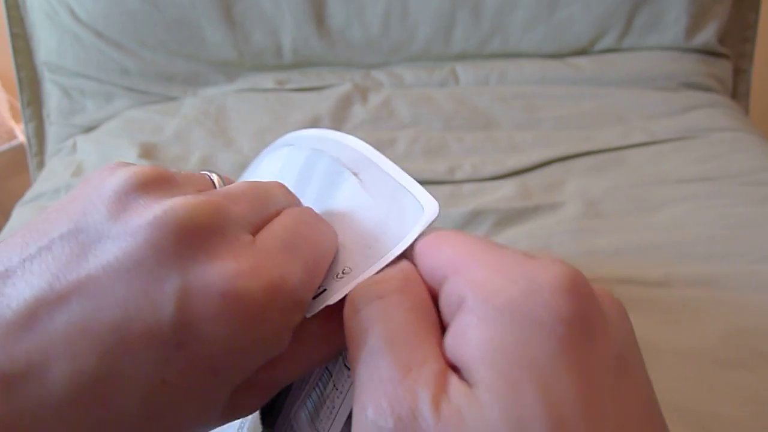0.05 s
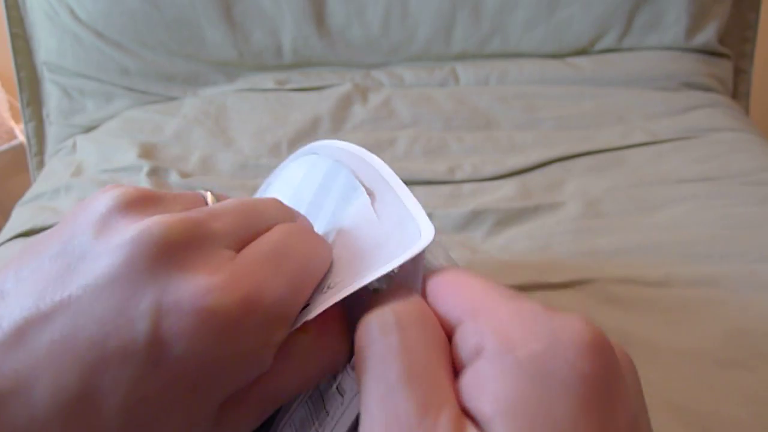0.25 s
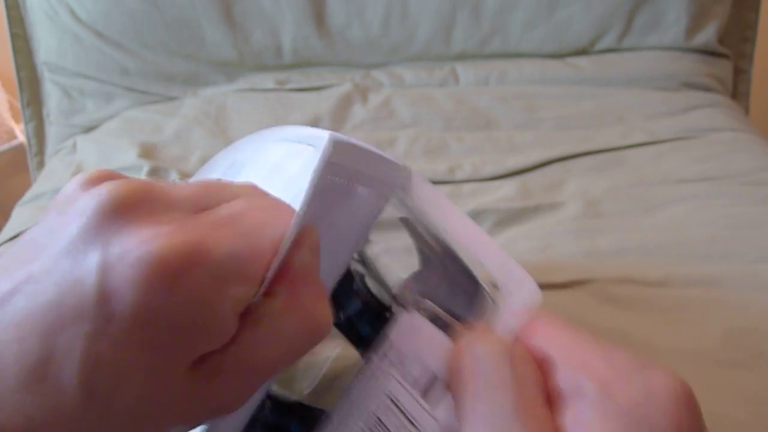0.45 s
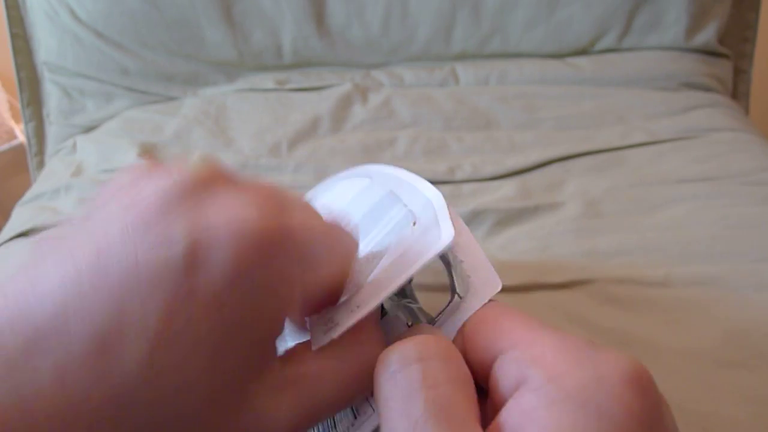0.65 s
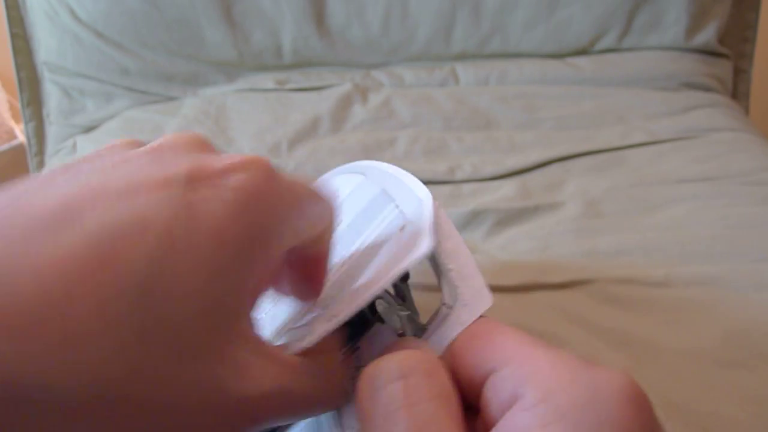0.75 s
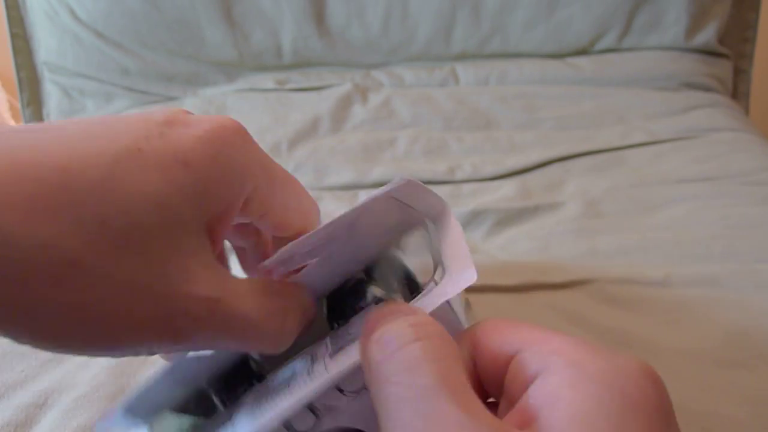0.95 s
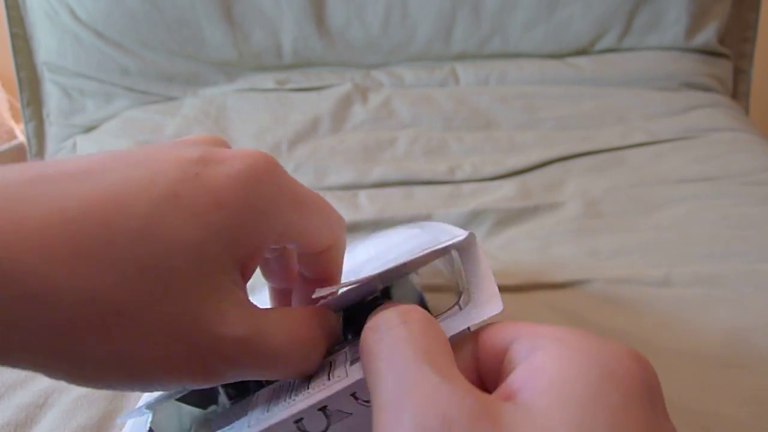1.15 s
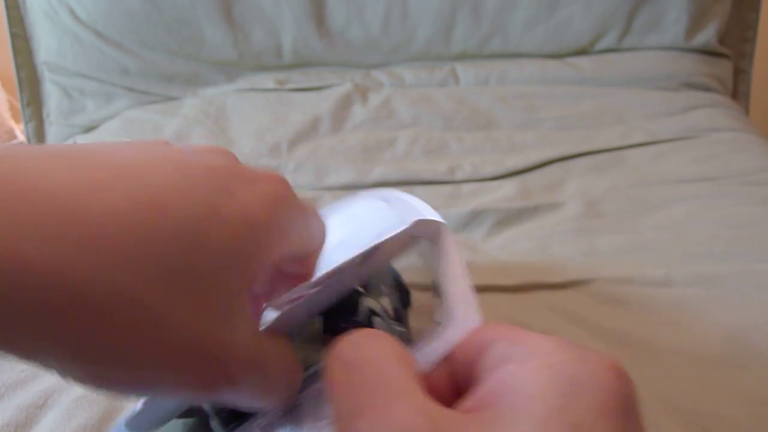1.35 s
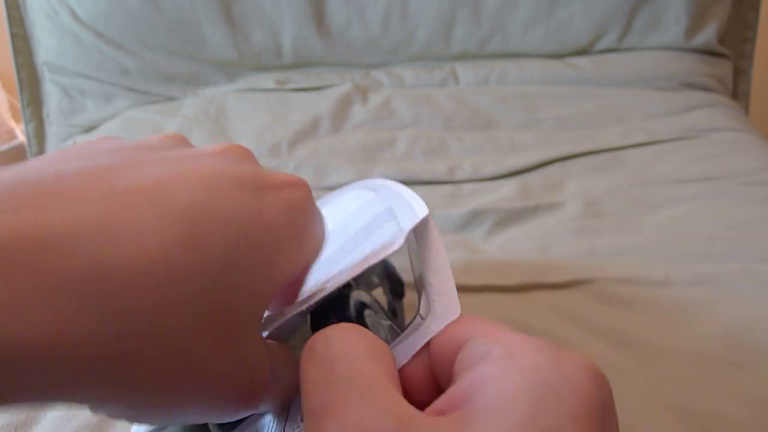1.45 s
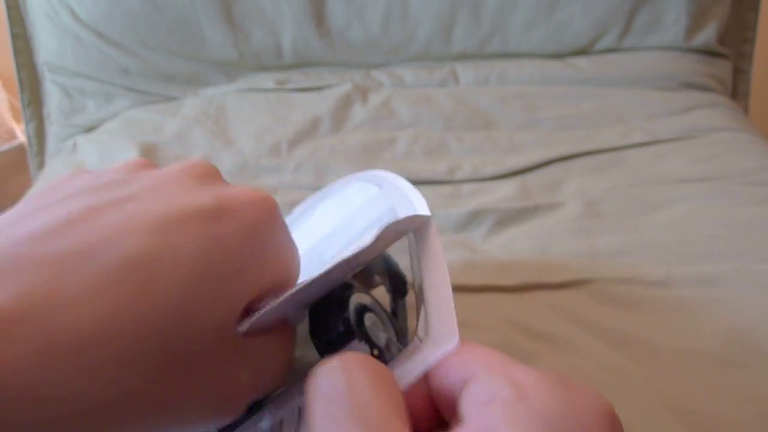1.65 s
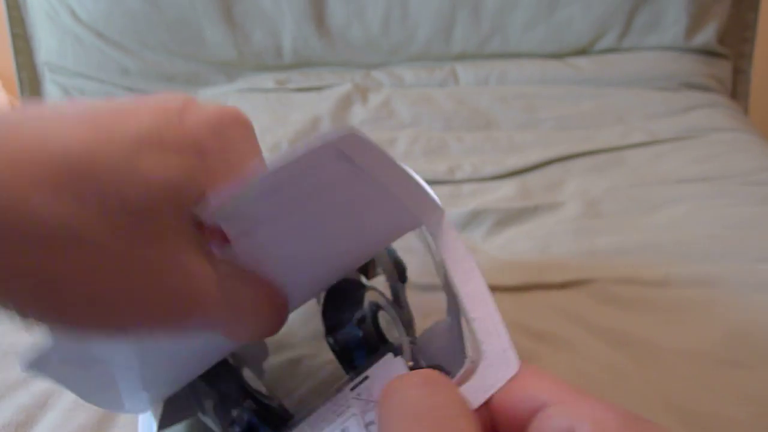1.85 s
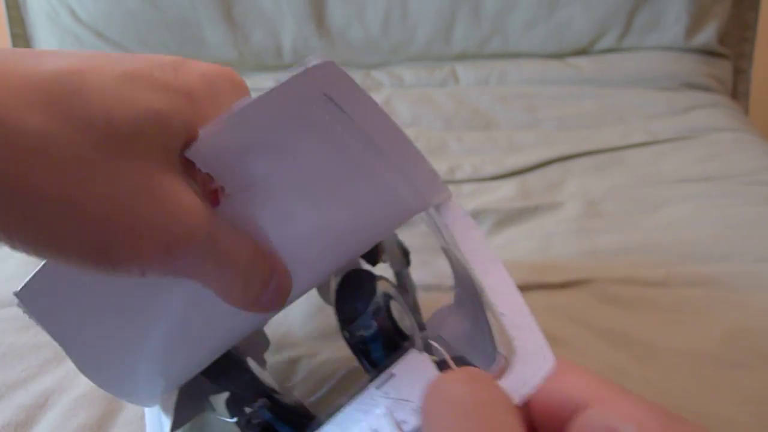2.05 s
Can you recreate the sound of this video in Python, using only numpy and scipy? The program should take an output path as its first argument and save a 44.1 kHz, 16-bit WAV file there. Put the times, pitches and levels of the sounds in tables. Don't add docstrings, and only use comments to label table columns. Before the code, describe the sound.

Close and dry in a furnished room, hands pull paper card off a plastic pack with crackling and popping, pause with faint ticks and soft knocks, then tear again in sharp, bright cracks over faint hiss.

```python
import sys
import numpy as np
from scipy import signal
from scipy.fft import rfft, irfft
from scipy.io import wavfile
from scipy.ndimage import uniform_filter1d

SR = 44100
rng = np.random.default_rng(int(sys.argv[2]) if len(sys.argv) > 2 else 0)


def rack_gain(trim_db):
    fader = np.asarray(trim_db, float)
    return 10 ** (fader / 20)


def generate_wav(signal):
    frames = np.transpose(np.atleast_2d(signal))
    scaled = np.clip(frames, -1, 1) * 32767
    pcm = np.round(scaled).astype(np.int16)
    wavfile.write(sys.argv[1], SR, pcm)


N = 92610
REGRIP_S = 1.3

# pitch_hz, width_hz, level_db
CARD_MODES = [(430, 32, -3.5), (507, 19.6, 1.5), (750, 34.6, 5), (959, 22, 4), (1215, 39, -1.5),
              (1346, 32, 3.5), (1601, 49, -2), (1818, 40, 0)]
# pitch_hz, width_hz, level_db
EARLY_BLISTER_MODES = [(2500, 510, -6), (3170, 94, 1), (4000, 620, -13), (4800, 143, -0.5),
                       (5590, 1100, -11), (6750, 130, -13)]
# pitch_hz, width_hz, level_db
LATE_BLISTER_MODES = [(2440, 300, 4.5), (2977, 130, 12.5), (3518, 135, 9.5), (4540, 130, -1),
                      (4833, 640, 2), (6300, 230, 8.5)]


def evened(x):
    return x / np.sqrt(np.mean(x ** 2) + 1e-20)


def peaked(x):
    return x / abs(x).max()


def add(mix, start_s, sound):
    part = mix[round(start_s * SR):][:len(sound)]
    part += sound[:len(part)]


def slow(seconds):
    width = int(seconds * SR)
    once = uniform_filter1d(rng.standard_normal(N), width)
    return evened(uniform_filter1d(once, width))


def ring(x, hz, width_hz):
    return signal.lfilter(*signal.iirpeak(hz, hz / width_hz, SR), x)


def body(x, modes, damp, wander_db=0):
    out = np.zeros(len(x))
    for k, (hz, width_hz, level_db) in enumerate(modes):
        if wander_db:
            level_db = level_db + wander_db * slow(.025)
        width_hz = width_hz * damp
        out += (-1) ** k * rack_gain(level_db) * ring(x, hz, width_hz) / np.sqrt(width_hz)
    return out


def room_floor():
    # pitch_hz, level_db (per Hz)
    hiss_curve = [(12, -66), (20, 4), (110, 3), (434, -1.5), (589, -31), (1170, -8.5), (5660, -21.5),
                  (6940, -47.5), (8720, -59.5), (11300, -90), (19200, -120)]
    hiss_db, hum_db = -55.5, -58
    hum_hz, hum_width_hz = 110.1, 20.5
    hz = np.fft.rfftfreq(N, 1 / SR)
    curve_hz, curve_db = np.transpose(hiss_curve)
    gain = rack_gain(np.interp(np.log(hz + 1), np.log(curve_hz + 1), curve_db))
    hiss = irfft(rfft(rng.standard_normal(N)) * gain, N)
    hum = ring(rng.standard_normal(N), hum_hz, hum_width_hz)
    hum = ring(hum, hum_hz, hum_width_hz)
    return rack_gain(hiss_db) * evened(hiss) + rack_gain(hum_db) * evened(hum)


def room_tail(x):
    t60_s, tail_db, dull_hz = 0.086, -18.5, 4000
    at = np.arange(150, SR // 3, 20)
    taps = np.zeros(SR // 2)
    decay = rack_gain(-60 * at / SR / t60_s)
    taps[at + rng.integers(0, 20, len(at))] = rng.choice([-1., 1.], len(at)) * decay
    taps = signal.lfilter(*signal.butter(1, dull_hz, fs=SR), taps)
    return rack_gain(tail_db) * signal.fftconvolve(x, taps / np.linalg.norm(taps))[:N]


def knock(peak_db, hz, cycles):
    u = np.arange(int(6 * cycles * SR / hz)) * hz / SR / cycles
    push = u * np.exp(-u - u * u / 4) * np.sin(2 * np.pi * u * cycles)
    return rack_gain(peak_db) * peaked(push)


def card_knocks():
    # start_s, peak_db, pitch_hz, cycles
    knock_rows = [(.197, -25.5, 401, 0.88), (0.441, -21.5, 804, 2.3), (.461, -22, 600, 2.8),
                  (.472, -15.5, 620, 1.2), (0.468, -32, 116.5, 1.5), (.49, -26, 776, 2.6),
                  (0.503, -32.5, 136, 1.5), (0.542, -33.5, 480, 1.5), (0.586, -35, 370, 1.25),
                  (0.646, -28.5, 247, 0.94), (0.69, -29.5, 490, 0.98), (.767, -34, 716, 1.9),
                  (0.847, -39, 111, 1), (.919, -31.5, 254, 0.29), (1.12, -37, 340, 1.4),
                  (1.143, -44.5, 290, 1), (1.506, -41, 294, 0.85), (1.531, -43.5, 222, 1.2),
                  (1.548, -45, 326, 2.1), (1.695, -35.5, 77, 0.36), (.4745, -20.5, 656, 2.5),
                  (0.4167, -16, 1540, 1.34), (.452, -25.5, 430, 4.2), (1.698, -14.5, 890, 1.3),
                  (1.7247, -17.5, 926, 1.8), (1.9225, -20.5, 1350, 2.6), (1.9282, -23, 1350, 1.9),
                  (1.946, -33, 1510, 4), (.099, -37.5, 850, 2.1), (1.537, -43.5, 108.7, 2),
                  (1.775, -27, 750, 2.8), (1.872, -31, 752, 3.6), (1.568, -54, 348, 3),
                  (1.696, -32, 223, 1.24), (1.925, -32, 276, 0.29)]
    out = np.zeros(N)
    for start_s, *row in knock_rows:
        add(out, start_s, knock(*row))
    return out


def grain_layer(early_modes, late_modes, broad_db, broad_hz, clump):
    grains_per_s, spread_db, clump_db = 5400, 3, 1.5
    damp, wander_db = 1.1, 4.5
    size = rack_gain(spread_db * np.minimum(rng.exponential(1, N), 4) + clump_db * clump)
    grains = size * rng.choice([-1., 1.], N) * (rng.random(N) < grains_per_s / SR)
    broad = signal.lfilter(*signal.butter(1, broad_hz, "band", fs=SR), grains)
    early = evened(body(grains, early_modes, damp, wander_db))
    late = evened(body(grains, late_modes, damp, wander_db))
    rung = np.where(np.arange(N) / SR < REGRIP_S, early, late)
    return evened(rung + rack_gain(broad_db) * evened(broad))


def peel_crackle():
    # start_s, level_db, card_share_db
    first_tear = [
        [(0, -40, 0), (.016, -41, 0), (.035, -54, 2), (.09, -54, 0), (.105, -43, -6), (.128, -37, -9),
         (.15, -41, -8), (.195, -48, -3)],
        [(.199, -34, -2), (.222, -35, -6), (.24, -44, -5), (.262, -51, -3), (.282, -49, -3), (.288, -41, -8),
         (.312, -40, -9), (.325, -46, -6), (.365, -45, -6)],
        [(.376, -38, -8), (.402, -35, -5), (.418, -25, -1), (.436, -31, -1), (.452, -28, 3), (.485, -36, 10),
         (.496, -28, 0), (.515, -38, 3), (.62, -53, 3)],
    ]
    # start_s, level_db, card_share_db
    second_tear = [
        [(.735, -55, 3), (.768, -50, 6), (.82, -69.5, 13), (.9, -52, 2.5), (.99, -60.5, 2.5),
         (1.03, -58.5, 4.5), (1.42, -66.5, 10.5)],
        [(1.432, -51, 6), (1.465, -56, 4), (1.51, -49, 2), (1.58, -52, 1), (1.626, -56, 1), (1.631, -45, -4),
         (1.65, -54, -1), (1.695, -59, 2)],
        [(1.7, -33.5, 6.5), (1.737, -44.5, 9), (1.76, -36.5, 1.5), (1.78, -32, -15.5), (1.82, -34, -0.5),
         (1.855, -41, 0), (1.875, -35, -7.5), (1.912, -50.5, 9)],
        [(1.926, -38.5, -4), (1.95, -52, 17.5), (1.99, -41.5, -9.5), (2.01, -42, 1.5), (2.035, -43.5, -4),
         (2.07, -44, -3.5), (2.1, -45, 6)],
    ]
    # low_hz, high_hz
    rustle_hz = ((1630, 8300), (167, 1250))
    start_s, level_db, card_db = np.concatenate(first_tear + second_tear).T
    t = np.arange(N) / SR
    clump = slow(0.0041)
    blister = grain_layer(EARLY_BLISTER_MODES, LATE_BLISTER_MODES, 2, rustle_hz[0], clump)
    card = grain_layer(CARD_MODES, CARD_MODES, 5, rustle_hz[1], clump)
    card_gain = rack_gain(np.interp(t, start_s, card_db))
    return rack_gain(np.interp(t, start_s, level_db)) * (blister + card_gain * card)


def crease_drive(hz, slip_s):
    slip_count, fizz_db, fizz_s = 10, -27, .005
    t = np.arange(int(.06 * SR)) / SR
    wait_s = np.append(0, rng.uniform(0, 2 * slip_s, slip_count - 1))
    size = np.append(1, slip_s / .0013 * rng.uniform(.08, .35, slip_count - 1))
    size *= np.exp(-wait_s / slip_s / 2)
    drive = np.zeros(len(t))
    drive[(wait_s * SR).astype(int)] = rng.choice([-1., 1.], slip_count) * size
    drive += rack_gain(fizz_db) * rng.standard_normal(len(t)) * np.exp(-t / fizz_s)
    return signal.lfilter(*signal.butter(2, min(7500, 1.8 * hz), fs=SR), drive)


def snap(start_s, peak_db, card_db, hz, slip_s):
    pitch_q, wide_db, edge_db, trim_db = 2.4, -4, -8, 0.5
    blister_damp, card_damp = 1.8, 3
    drive = crease_drive(hz, slip_s)
    modes = EARLY_BLISTER_MODES if start_s < REGRIP_S else LATE_BLISTER_MODES
    bright = peaked(ring(drive, hz, hz / pitch_q))
    bright += rack_gain(wide_db) * peaked(body(drive, modes, blister_damp))
    bright += rack_gain(edge_db) * peaked(np.diff(drive, prepend=0))
    card = peaked(body(drive, CARD_MODES, card_damp))
    return rack_gain(peak_db + trim_db) * (peaked(bright) + rack_gain(card_db) * card)


def blister_snaps():
    # start_s, peak_db, card_share_db, pitch_hz
    snap_rows = [(0.01, -26.5, -5.5, 4170), (.1255, -27.5, -16, 4700), (.139, -23.5, -7.5, 3300),
                 (0.157, -23.5, -16.5, 3200), (0.162, -25, -9, 3250), (0.167, -34.5, -2, 4000),
                 (.18, -24.5, -9, 5150), (.198, -29, 7, 4850), (.2135, -19.5, -9, 4800),
                 (.221, -26.5, -3.5, 2950), (.265, -29.5, -12, 4930), (0.2843, -26.5, -10, 4940),
                 (0.289, -30, -8, 5160), (0.296, -27.5, -28, 2730), (.334, -30, -13.5, 4800),
                 (.342, -30, -22, 4900), (.361, -28, -15, 4700), (.377, -27.5, -11.5, 4800),
                 (.385, -33, -22, 4800), (.408, -12, -22, 2100), (0.4151, -15, 0.5, 5200),
                 (0.4207, -22.5, 3, 3020), (.4415, -13, 0, 2540), (.45, -28.5, 0, 5050),
                 (.4525, -18, -14, 2970), (0.46, -27, 5, 5000), (0.477, -27, 13, 2640),
                 (1.778, -22.5, -2.5, 3460), (1.782, -19.5, -21, 3020), (1.793, -26, -12.5, 3500),
                 (1.815, -21, -6, 3460), (1.831, -25.5, -7.5, 6300), (1.869, -29, 3.5, 3540),
                 (1.9288, -21, 1, 4850), (1.935, -24, -2, 1450), (1.956, -23.5, -10, 3570),
                 (2.006, -28, -19, 3700), (2.044, -27, -6.5, 3670)]
    # start_s, peak_db, card_share_db, pitch_hz
    further_snap_rows = [(.4178, -7, -16, 1750), (.4468, -6, -16, 5000), (.4882, -9, -10, 5500),
                         (.4922, -13, -6, 3000), (.495, -16, -9, 6000), (.4975, -19, -6, 3500),
                         (1.6977, -2, -17, 3200), (1.6995, -12, -8, 4300), (1.703, -17, -5, 4600),
                         (1.7072, -19, -6, 3300), (1.7125, -10, -9, 3300), (1.7138, -11, -12, 3200),
                         (1.7245, -5, -15, 3200), (1.7255, -11, -10, 3600), (1.7298, -19, -3, 4500),
                         (1.9237, -13, -16, 3500), (1.6955, -31, -3, 3000), (.184, -24, -12, 3400),
                         (.7533, -23, -14, 5000), (.738, -31, -7, 3370), (1.4425, -26, -6, 3800),
                         (1.6285, -28, -6, 5500), (1.4248, -32, -6, 4200)]
    # start_s, peak_db, card_share_db,
    # pitch_hz
    tick_rows = [(0.684, -24.5, -7.5, 3200), (.762, -32.5, -4, 2940), (.79, -38, 3.5, 2120),
                 (.835, -34.5, 3.5, 2880), (.842, -39, 7.5, 1690), (.916, -32, -3, 2770),
                 (1.011, -38, 2, 2400), (1.084, -42, -9, 5000), (1.117, -37, -0.5, 2830),
                 (1.136, -33, -10, 4150), (1.252, -36.5, 0, 1900), (1.433, -31, 3, 1570),
                 (1.48, -48, 3, 3910), (1.499, -35.5, -0.5, 2500), (1.734, -39, 7, 1400),
                 (1.768, -26, -1, 6100), (1.803, -23, -2, 6300), (1.997, -41, -17, 4000),
                 (2.018, -34, -7, 4130), (2.08, -35, -23, 5300), (.689, -33, -5, 3380),
                 (.885, -48, 5, 1980), (.896, -43, 0, 3500), (.999, -40, -10, 3100), (1.02, -42, -10, 3050),
                 (.938, -45, 3, 2840), (1.62, -38.5, -4.5, 2500), (2.056, -36, -7, 3520)]
    snap_slip_s, tick_slip_s, tick_lag_s = .0013, .0024, .001
    out = np.zeros(N)
    for start_s, *row in snap_rows + further_snap_rows:
        add(out, start_s, snap(start_s, *row, snap_slip_s))
    for start_s, *row in tick_rows:
        start_s += tick_lag_s
        add(out, start_s, snap(start_s, *row, tick_slip_s))
    return out


def scene():
    pack = card_knocks() + peel_crackle() + blister_snaps()
    return (pack + room_tail(pack) + room_floor())[None]


def roll_off(x):
    return signal.sosfilt(signal.butter(12, 8870, fs=SR, output="sos"), x)


def record(dry):
    edge_hz, top_hz, bass_hz = 7424, 7850, 98.3
    band_limit = signal.firwin(63, edge_hz, window="boxcar", fs=SR)
    x = signal.oaconvolve(dry, band_limit[None], "same")
    x = signal.lfilter(*signal.butter(2, top_hz, fs=SR), x)
    x = signal.lfilter(*signal.butter(1, bass_hz, "high", fs=SR), x)
    return roll_off(x)


dry = scene()
out = record(dry)
generate_wav(out)
```